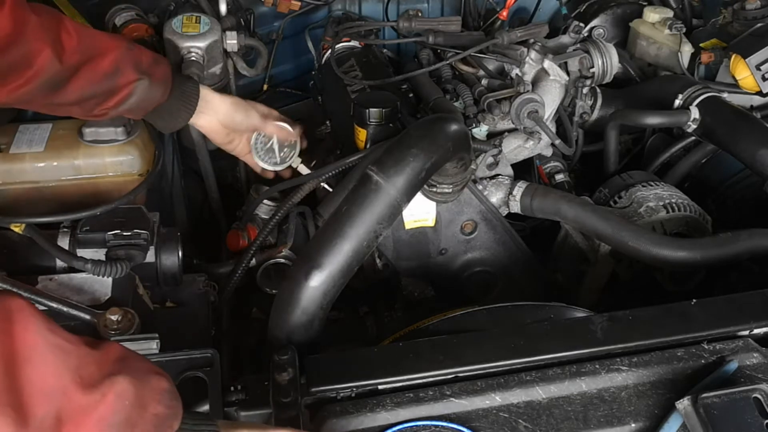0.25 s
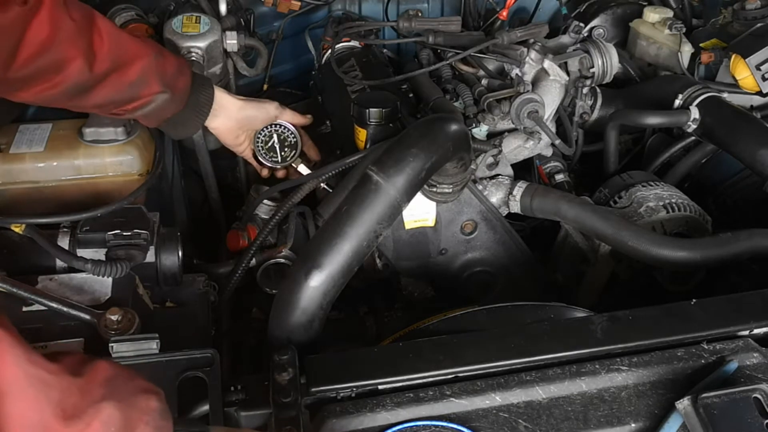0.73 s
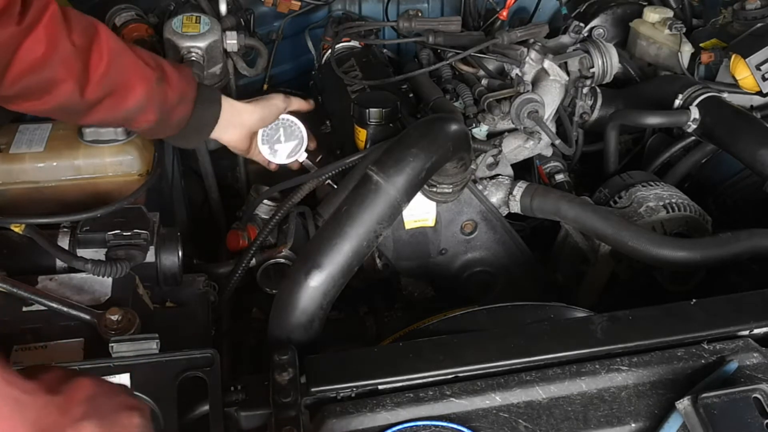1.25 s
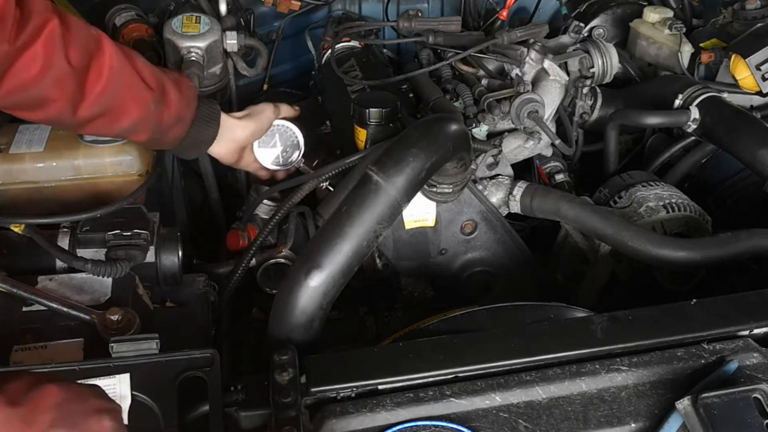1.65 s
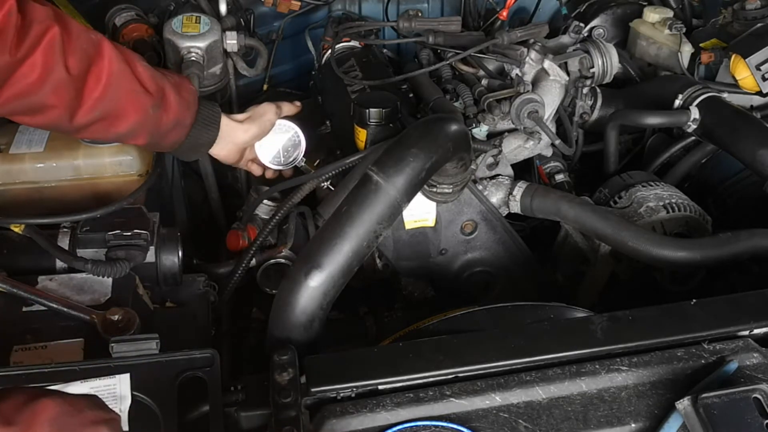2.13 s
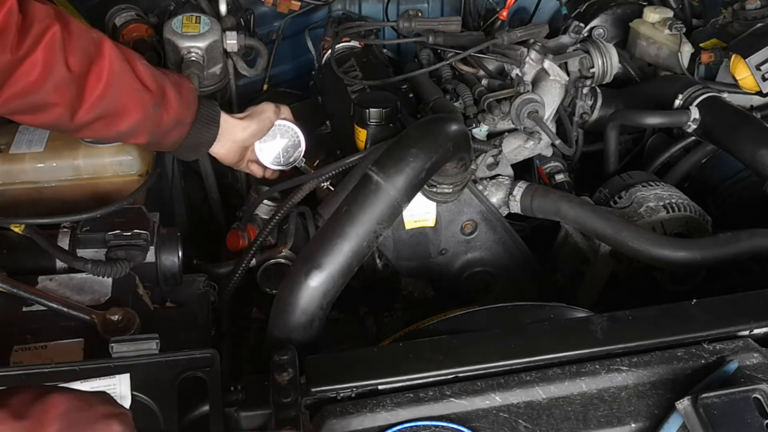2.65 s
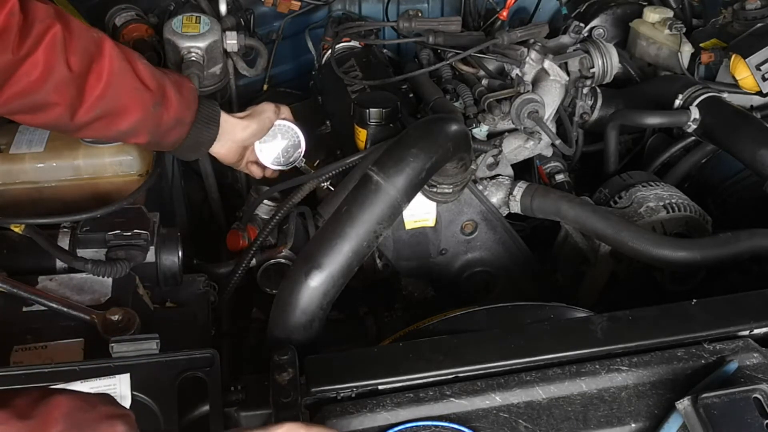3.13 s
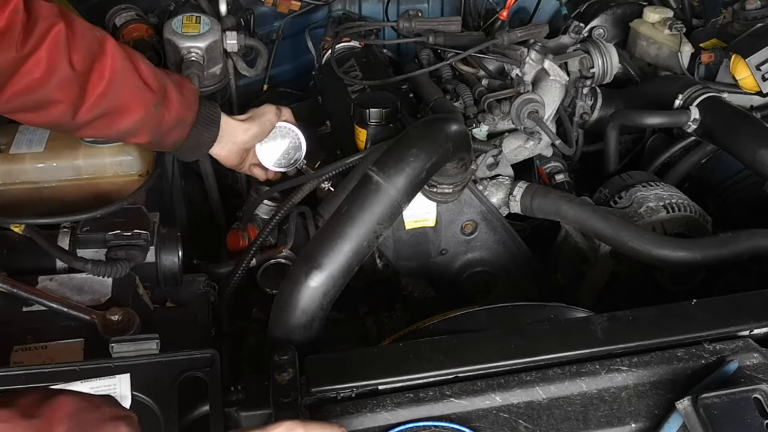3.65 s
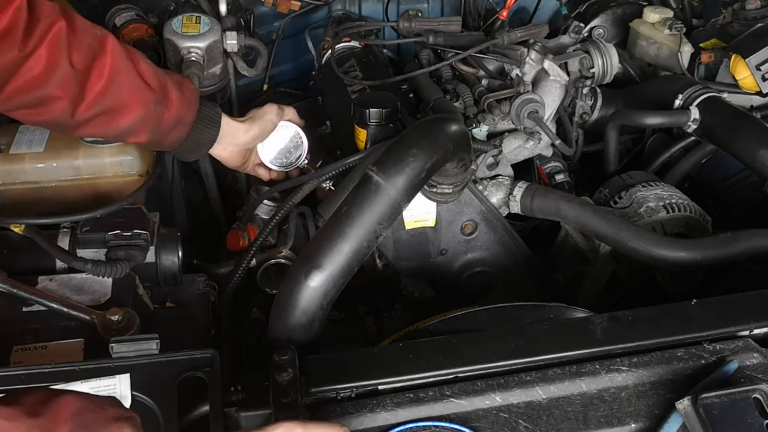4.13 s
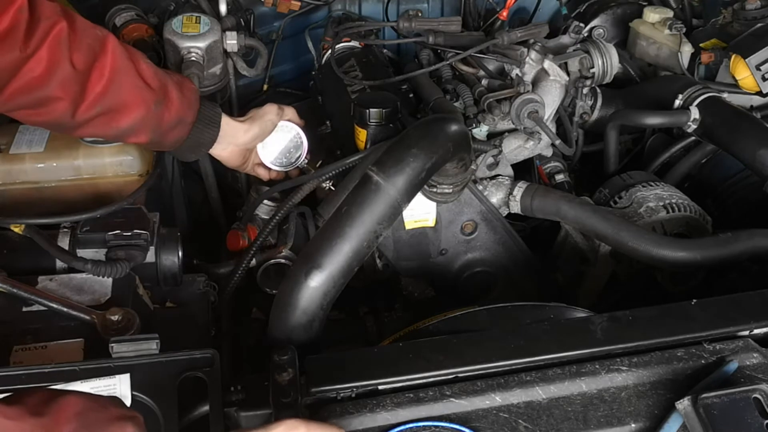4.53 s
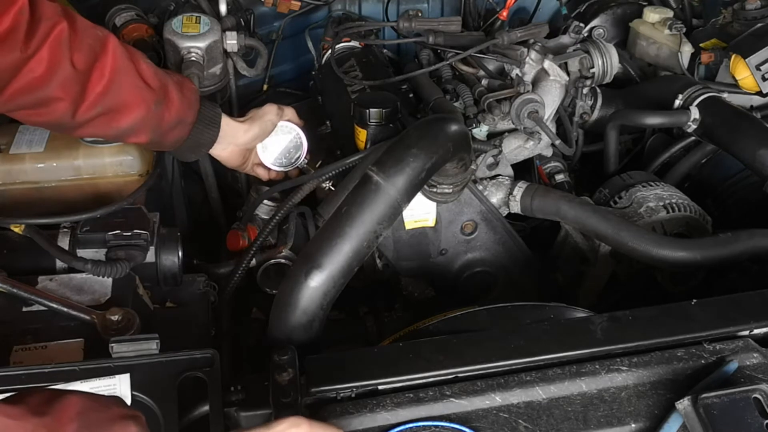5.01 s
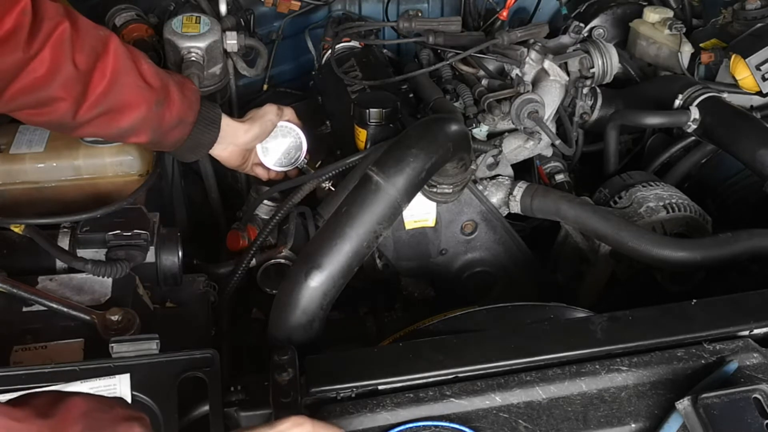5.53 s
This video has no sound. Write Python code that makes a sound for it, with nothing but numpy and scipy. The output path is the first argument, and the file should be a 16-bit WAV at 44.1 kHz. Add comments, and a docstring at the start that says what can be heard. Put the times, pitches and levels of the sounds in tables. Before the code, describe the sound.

Quiet scuffs and ticks from a handled gauge, then two brief, rattling cranks of a four-cylinder car engine that never catches.

```python
"""In a garage, over an open bonnet, a starter motor cranks a four-cylinder engine twice; it never fires.
The pinion clacks in, ringing the steel, and periodic tooth contact makes the gears whine and rattle
up to speed through the resonances of the bell housing. The first try sags under compression and kicks
out; the second cranks on. In the pauses a hand shifts a pressure gauge: small impacts tick and
friction scuffs over a low rumble."""
import sys
import numpy as np
from scipy import signal
from scipy.fft import rfft, irfft
from scipy.io import wavfile
from scipy.ndimage import map_coordinates

SR = 44100
rng = np.random.default_rng(int(sys.argv[2]) if len(sys.argv) > 2 else 0)


def to_wav(sig):
    """Store sig (one row per channel, or 1-D mono) as 16-bit WAV at the path in sys.argv[1].

    Samples outside -1..1 are clipped; the rate is SR.
    """
    pcm = np.clip(np.atleast_2d(sig), -1, 1) * 32767
    pcm = np.round(pcm).astype(np.int16)
    wavfile.write(sys.argv[1], SR, pcm.T)  # frames by channels


N = 254702
TIME, BINS = np.arange(N) / SR, np.fft.rfftfreq(N, 1 / SR)

# Noise spectra. Each row: frequency in Hz, relative spectral density in dB.
RUMBLE_COLOUR = [(8.8, -26.5), (15, 3), (67, -1.5), (165, -17), (405, -56), (625, -59), (700, -49.5),
                 (910, -70.5), (1540, -120)]
AIR_COLOUR = [(88, -26), (150, 0), (350, -9), (495, -15), (787, -17), (1010, -17.5), (1870, -13.5),
              (3540, -21), (4540, -24), (9820, -32), (15000, -41)]
SCUFF_COLOUR = [(290, -41), (500, -17.5), (709, -10.5), (1660, -10.5), (1850, -3.5), (2560, -3.5),
                (3020, -7), (7580, -8.5), (14000, -47)]
CASTING_COLOUR = [(30, -8), (80, 2), (170, -4.5), (260, -7), (380, -7), (500, -21), (1500, -45)]
COAST_COLOUR = [(88, -29.5), (150, -1.5), (556, -6.5), (1070, -1.5), (1200, -8), (1700, 2.5), (3890, -7.5),
                (8100, -8), (15000, -35)]
STEEL_COLOUR = [(88, -36.5), (150, -14), (248, -13.5), (420, -8), (728, -15.5), (936, -8.5), (1450, -5),
                (1730, 1), (2060, -4), (2500, 0), (4460, -10), (5100, -3.5), (6430, -14), (7790, -3.5),
                (11500, -25), (15000, -31)]
SPARK_COLOUR = [(2000, -40), (5500, -14), (8500, 3.5), (10500, -6), (14500, -7.5)]
GEAR_COLOUR = [(88, -32), (150, -17), (189, -15), (294, -14), (420, -15.5), (720, -13.5), (930, -2.5),
               (1230, -4), (2140, -6), (2750, -9.5), (3970, -17.5), (4720, -13.5), (6180, -19),
               (7640, -18.5), (15000, -45)]
# Reverberation of the garage. Each row: frequency in Hz, t60 in seconds.
GARAGE_T60 = [(100, 0.51), (500, 0.2), (1500, 0.38), (4000, 0.33), (8000, 0.27), (14000, .22)]
# Likeness of the two channels. Each row: frequency in Hz, left-right correlation.
COHERENCE = [(60, 0.97734), (150, 0.96), (300, 0.70875), (600, 0.2), (950, 0.8), (1200, .7), (1600, .3),
             (2200, -0.07), (4000, 0), (12000, 0)]
# Balance of the engine's direct sound. Each row: frequency in Hz, left minus right in dB.
ENGINE_BALANCE = [(60, -1), (110, -0.5), (200, -1), (380, 3.5), (700, 0.5), (1290, 2.5), (2380, 6),
                  (4400, 4.5), (8120, 9), (10500, -0.5), (15000, 0)]

# Arm movements near the microphone. Each row: middle and half width in seconds, rumble and rustle in dB.
ARM_MOVES = [(.14, 0.14147, -40, -62.5), (0.45, 0.12, -37.5, -59.5), (.65, 0.1132, -45.5, -62),
             (1.0, 0.2405, -55.5, -68.5), (1.5, 0.3029, -71, -61.5), (1.8, 0.2328, -50, -70.5)]
# Handling thuds. Each row: start in seconds, level in dB, frequency in Hz, t60 in seconds.
HANDLING_THUDS = [(.09, -31.5, 48.03, 0.09125), (0.129, -27.5, 54.82, 0.07907), (.16, -32.5, 50.01, 0.0772),
                  (.203, -30.5, 80.3, 0.1119), (.352, -27, 41.85, 0.1116), (.397, -26.5, 120, 0.0711),
                  (.44, -30.5, 55.06, 0.1141), (.485, -28, 45.43, 0.1621), (.622, -36.5, 79.85, 0.0617),
                  (0.646, -30.5, 37.97, 0.0763), (1.75, -35, 26.01, 0.1788)]
# The hose and a panel bump in the engine bay. Each row: start in seconds, level in dB, frequency in Hz, t60 in
# seconds.
BAY_BUMPS = [(.392, -49, 250, .045), (1.648, -52.5, 1277, .1), (1.688, -59, 1300, .08),
             (1.747, -55.5, 2350, .09)]
# Taps on the gauge case. Each row: start in seconds, level in dB.
GAUGE_TAPS = [(1.013, -67.5), (1.724, -64.5), (2.225, -60.5), (4.036, -54.5), (4.094, -63.5)]
# Modes of the case. Each row: frequency in Hz, level in dB, t60 in seconds.
GAUGE_MODES = [(2058.7, -8, 0.0757), (2519, -2, 0.1407), (3045.7, -8.5, 0.0749), (3787.4, -2.5, 0.1265),
               (5288.7, 0, 0.1077)]
# Ticks of the gauge's metal fitting. Each row: start in seconds, level in dB, ring frequency in Hz.
FITTING_TICKS = [(.041, -59.5, 8441), (0.161, -58.5, 7997), (0.293, -64.5, 5940), (.8767, -42.5, 8274),
                 (1.182, -53.5, 6693), (1.201, -60.5, 6900), (1.226, -49.5, 7297), (1.5217, -56.5, 7930),
                 (1.652, -53.5, 7744), (1.7235, -45, 8150), (4.034, -48.5, 7698), (4.094, -62, 7696)]
# Sleeve and hose rub. Each row: start in seconds, level in dB, rise in seconds, tilt in dB per octave.
SCUFFS = [(.2, -58.5, 0.03061, -1.5), (.29, -66.5, 0.00977, -1), (.975, -61, 0.03562, 0.5),
          (1.521, -61.5, 0.0132, 0), (1.57, -65, .035, -4.5), (1.636, -53, 0.01677, -3.5),
          (1.69, -61, 0.00935, -3.5), (1.722, -60.5, 0.02133, -4), (1.97, -70.5, 0.0813, 5),
          (2.19, -56.5, 0.03372, 0), (4.02, -54, 0.012303, 1.5), (4.613, -63, 0.021435, 2.5),
          (4.675, -65, 0.0251, 0)]
# Thin squeaks. Each row: start and length in seconds, level in dB, frequency and its bend in Hz.
CHIRPS = [(2.713, .08, -61, 7830, -250), (2.92, .124, -53, 8300, 3200), (3.09, .05, -52, 8600, 1000),
          (3.108, .014, -43, 9700, 400), (3.135, .12, -58, 8200, 2450), (3.168, .05, -59, 12400, 400),
          (3.305, .065, -43, 9500, 600), (3.795, .05, -74, 7070, 500), (3.905, .05, -74, 7070, 450),
          (5.283, .012, -44, 10120, 200), (5.492, .012, -54, 14000, 200), (5.674, .014, -48, 10100, 200)]

# Low puffs of the turning engine. Each row: start in seconds, level in dB, pitch in Hz, t60 in seconds.
PUFFS = [(2.988, -34.5, 39.95, 0.1519), (3.1, -34, 44.99, 0.1433), (3.152, -33, 47.52, 0.2091),
         (3.335, -23, 58.17, 0.0744), (5.425, -26, 55, 0.24), (5.432, -30.5, 94.41, 0.1502)]
# Modes of the mounted block. Each row: frequency in Hz, level in dB, t60 and rise in seconds.
BLOCK_MODES = [(55, -14, .1, .012), (124, -1, .12, .021)]
# Modes of struck steel. Each row: frequency in Hz, t60 in seconds, level in dB.
STEEL_MODES = [(955, 0.055, -2), (1145, .05, -6.5), (1331.6, 0.047, 2), (1608, 0.054, -4.5),
               (1853.6, 0.044, -1.5), (2457.5, 0.055, 2.5), (2773.1, 0.15, -6), (3233.2, 0.14, 2.5),
               (4943, 0.045, -13), (7121.6, 0.08, -2.5), (7750, .07, -3)]
# The pinion strikes the ring gear and bounces. Each row: delay in seconds, level in dB,
# rise and t60 in seconds, tilt in dB per octave, ring level in dB, ring centre in Hz.
ENGAGE = [(0, -16, 0.0013, .085, 0, -5, 1843), (.007, -19, 0.00036, .06, -1, -3, 2490)]
# The solenoid pulls in before the strike. One row as in ENGAGE, without the delay.
SOLENOID = (-30.5, 0.0002, 0.3244, -1.5, -10, 1400)
# The pinion seats after the strike. One row as in ENGAGE, without the level.
SEAT = (.015, 0.0265, 0.0572, -5, 2, 950)
# The pinion rasps out, flies back, hits its stop and bounces. Rows as in ENGAGE, timed from key-off.
KICK_OUT = [(-.06, -31.5, 0.01, 0.31, 13.5, -8, 7520), (0, -19.5, 0.0064, 0.031, -1, -2, 1350),
            (.0035, -13, .0012, .058, 7.5, -6, 1330), (0.0104, -15.5, 0.0011, 0.089, 5, -7, 7500)]
# Backlash as the load reverses. Each row: start in seconds, clack and block levels in dB,
# tilt in dB per octave, thud level in dB.
BACKLASH = [(3.09, -26, -25, -3.5, -32.5), (3.297, -29.5, -43, -5, -35), (3.516, -36, -39, -1.5, -53)]
# Resonances and dead spots of the bell housing. Each row: frequency and width in Hz, lift in dB.
HOUSING_MODES = [(245, 130, 5), (430, 70, -3), (760, 120, -5), (950, 56, 13.5), (1040, 40, 8.5),
                 (1130, 60, 12), (1290, 50, 9), (1605, 34, 8), (1780, 45, 4), (2400, 70, 8),
                 (2735, 140, 12), (2960, 150, -5), (3177, 55, 10.5), (3490, 45, 9), (4690, 110, 7),
                 (5240, 160, 5), (5950, 700, -6), (7460, 150, 7)]
# Partials of the whine. Each row: multiple of the tooth frequency, level in dB.
GEAR_ORDERS = [(.83, -28), (1, -18), (1.17, -30), (1.5, -25), (2, -17.5), (2.68, -23), (3, -18), (3.6, -25),
               (4, -19), (5, -25.5), (6, -25), (6.95, -22.5), (7.96, -19.5), (8.4, -13), (8.75, -20.5),
               (10, -23), (11.4, -23.5), (12.4, -20.5), (13.2, -24.5), (14, -23), (15.3, -23.5),
               (16.3, -15.5), (17.2, -22)]
# The compression stroke. One row: peak and half width in seconds, share of the speed lost.
COMPRESSION = (3.366, .198, .476)
# Turns of the key. Each row: strike, stop and spin-up time in seconds,
# gear and seating levels in dB, solenoid lead in seconds.
TRIES = [(2.8078, 3.344, .2, -30, -34.5, .017), (5.203, 5.8, .2485, -28.5, -22, .021)]

MESH_HZ, FREE_HZ = 111, 392  # tooth frequency at engagement and at free speed


def amp(db):
    """Amplitude grows tenfold for every 20 dB."""
    return 10 ** (np.asarray(db) / 20)


def unit_rms(x):
    """Normalisation to unit mean power."""
    return x / np.sqrt(np.mean(x ** 2) + 1e-20)


def curve_at(points, hz):
    """Interpolation on a logarithmic frequency axis."""
    f, value = np.transpose(points)
    return np.interp(np.log(hz + 1), np.log(f + 1), value)


def add(mix, s, sound):
    """Superposition: a sound joins the mix at s seconds."""
    part = mix[:, round(s * SR):][:, :sound.shape[-1]]
    part += sound[..., :part.shape[1]]


def stereo(x, gain_db):
    """Partial coherence: two unrelated signals, filtered, grow alike in the bass as at close points."""
    hz, (a, b) = np.fft.rfftfreq(x.shape[1], 1 / SR), rfft(x)
    likeness = curve_at(COHERENCE, hz)
    mid, side = a * np.sqrt(1 + likeness), b * np.sqrt(1 - likeness)
    spectra = np.array([mid + side, mid - side]) * amp(gain_db(hz))
    return unit_rms(irfft(spectra, x.shape[1]))


def stereo_phase(hz):
    """A tone's left-right correlation is the cosine of its phase difference."""
    return np.arccos(curve_at(COHERENCE, hz)) * np.array([[-.5], [.5]])


def noise(colour, size, tilt_db=0):
    """Spectral shaping of white noise, with a tilt per octave above 500 Hz."""
    white = rng.standard_normal((2, size))
    return stereo(white, lambda hz: curve_at(colour, hz) + tilt_db * np.log2(np.maximum(hz, 500) / 500))


def wobble(size, hz, step=8):
    """Random modulation: low-passed noise of unit rms."""
    coarse = signal.lfilter(*signal.butter(2, hz, fs=SR / step), rng.standard_normal(size // step + 2))
    return unit_rms(np.interp(np.arange(size) / step, np.arange(len(coarse)), coarse))


def blow(t, rise, t60):
    """Damping: after a linear rise the amplitude decays exponentially."""
    return np.minimum(t / rise, 1) * np.exp(-np.log(1000) * np.maximum(t - rise, 0) / t60)


def swell(t, middle, half_width):
    """A Gaussian envelope of height 1."""
    return np.exp(-((t - middle) / half_width) ** 2)


def background(settle_db_per_s=1, lumps_db=2.5):
    """Incoherent powers add: low rumble and room hiss both swell when the arm moves."""
    rumble, hiss = amp(-52 - settle_db_per_s * TIME), amp(-65.5)
    for middle, half_width, rumble_db, rustle_db in ARM_MOVES:
        move = swell(TIME, middle, half_width)
        rumble = np.hypot(rumble, amp(rumble_db) * move)
        hiss = np.hypot(hiss, amp(rustle_db) * move)
    lumpy_rumble = noise(RUMBLE_COLOUR, N) * rumble * amp(lumps_db * wobble(N, 11))
    return lumpy_rumble + noise(AIR_COLOUR, N) * hiss


def garage(x):
    """Diffuse reverberation: each band decays at its own rate."""
    hz, t, bands = signal.stft(stereo(rng.standard_normal((2, SR)), np.zeros_like), SR, nperseg=256)
    decay = np.exp(-np.log(1000) * t / curve_at(GARAGE_T60, hz)[:, None])
    tail = signal.istft(bands * decay * np.minimum(t / .004, 1), SR, nperseg=256)[1]
    return signal.fftconvolve(x, tail / np.linalg.norm(tail[0]), axes=1)[:, :N]


def engine_bay(x, echo_db=-10):
    """Interference of dense early echoes: a gliding partial flares and fades across standing waves."""
    t = np.arange(SR // 12) / SR
    echoes = stereo(rng.standard_normal((2, len(t))), np.zeros_like) * blow(t, rise=.0023, t60=.08)
    echoes *= amp(echo_db) / np.linalg.norm(echoes[0])
    reflected = signal.fftconvolve(x, echoes, axes=1)[:, :x.shape[1]]
    return (x + reflected) / np.hypot(1, amp(echo_db))


def thump(db, hz, t60, rise=.012):
    """A damped oscillator swings at one low frequency."""
    t = np.arange(SR // 2) / SR
    return amp(db) * blow(t, rise, t60) * np.sin(2 * np.pi * hz * t)


def tap(db, hz, t60, spread=.02335):
    """Close modes of a small struck part ring as narrow-band noise, building over two cycles."""
    t = np.arange(SR // 4) / SR
    white = rng.standard_normal((2, len(t)))
    cluster = stereo(white, lambda f: -20 * np.log10(1 + ((f / hz - 1) / spread) ** 2))
    return amp(db) * cluster * blow(t, 2 / hz, t60)


def gauge_case(db):
    """Modal superposition: one tap excites every mode of the case."""
    return sum(tap(db + mode_db, hz, t60) for hz, mode_db, t60 in GAUGE_MODES)


def fitting_tick(db, hz):
    """A brief metal contact has a broad, bright spectrum and leaves a short ring."""
    t = np.arange(SR // 4) / SR
    colour = [(300, -24.5), (1500, -10), (3500, -15.5), (5300, -8.5),
              (6300, -1), (8200, 6), (10500, -23.5), (15000, -36)]  # Hz, dB
    click = amp(db - 2) * noise(colour, len(t)) * blow(t, rise=.001, t60=.04142)
    return click + tap(db - 10, hz, t60=.08616, spread=.0659)


def scuff(db, rise, tilt_db, grain_db=2.5):
    """Friction noise: a short rub, made grainy by random amplitude modulation."""
    t = np.arange(SR // 2) / SR
    grain = amp(db + grain_db * wobble(len(t), 137.56))
    return grain * noise(SCUFF_COLOUR, len(t), tilt_db) * blow(t, rise, t60=.28832)


def chirp(length, db, hz, bend_hz):
    """Frequency and amplitude modulation: a thin tone bends away and back, sputtering."""
    arch = np.sin(np.linspace(0, np.pi, int(length * SR)))
    pitch = hz + bend_hz * arch + .009 * hz * wobble(len(arch), 700)
    sputter = unit_rms(amp(3.5 * wobble(len(arch), 120)))
    return amp(db) * sputter * np.sqrt(abs(arch)) * np.sin(2 * np.pi * np.cumsum(pitch) / SR)


def engine_block(db):
    """Mass on springs: a blow rocks the block on its mounts."""
    return sum(thump(db + mode_db, hz, t60, rise) for hz, mode_db, t60, rise in BLOCK_MODES)


def casting_thud(db):
    """Structure-borne sound: a hard blow carries through the castings as low, damped noise."""
    t = np.arange(SR // 4) / SR
    return amp(db) * noise(CASTING_COLOUR, len(t)) * blow(t, rise=.004, t60=.1)


def coast(sag_db_per_s=21.5, grain_db=2, coast_s=.22, stop_t60=.1325):
    """Friction: with the pinion out, pistons and belts rub on until the next compression stops them."""
    t = np.arange(SR // 2) / SR
    level_db = -45.5 - sag_db_per_s * t + grain_db * wobble(len(t), 200)
    stop = np.exp(-np.log(1000) * np.maximum(t - coast_s, 0) / stop_t60)
    return amp(level_db) * stop * noise(COAST_COLOUR, len(t))


def clack(db, rise, t60, tilt_db, ring_db, centre_hz, reach_octaves=.17):
    """Impact of steel on steel: a dense crash, and free vibration of the modes near centre_hz."""
    t = np.arange(SR // 4) / SR
    crash = noise(STEEL_COLOUR, len(t), tilt_db) * blow(t, rise, t60)
    ring = np.zeros((2, len(t)))
    for hz, mode_t60, mode_db in STEEL_MODES:
        excitation = amp(ring_db + mode_db) / (1 + (np.log2(hz / centre_hz) / reach_octaves) ** 2)
        phase = 2 * np.pi * (hz * t + rng.random()) + stereo_phase(hz)
        ring += excitation * blow(t, rise, mode_t60) * np.sin(phase)
    return amp(db) * (crash + ring)


def brush_sparks(size, per_s=750, spread_db=4, flurry_db=3):
    """Shot noise: the brushes spark on the commutator in flurries of very unequal impulses."""
    sparks = (rng.random(size) < per_s / SR) * amp(spread_db * np.minimum(rng.exponential(1, size), 3))
    crackle = stereo(sparks * rng.standard_normal((2, size)), lambda hz: curve_at(SPARK_COLOUR, hz))
    return engine_bay(crackle, echo_db=-1.5) * amp(flurry_db * wobble(size, 15))


def resonance_db(hz):
    """Resonance: the bell housing lifts or dips the response in Lorentzian bands."""
    grid = BINS[::32]
    gain = 1 + sum((amp(db) - 1) / (1 + (2 * (grid - f) / width) ** 2) for f, width, db in HOUSING_MODES)
    return np.interp(hz, grid, 20 * np.log10(gain))


def housing_db(hz, ring_share=.35):
    """Cascaded gains add in dB: the housing's broad response plus a share of its resonances."""
    return curve_at(GEAR_COLOUR, hz) + ring_share * resonance_db(hz)


def gear_whine(teeth, pitch, spacing_error=.003, flutter=.33):
    """Periodic meshing radiates partials; uneven tooth spacing blurs the high ones by phase modulation."""
    whine = 0
    for order, db in GEAR_ORDERS:
        cycles = order * (teeth + spacing_error * wobble(len(teeth), 90)) + rng.random()
        phase = 2 * np.pi * cycles + stereo_phase(order * pitch.mean())
        partial = np.sqrt(2) * (1 + flutter * wobble(len(teeth), 22)) * np.cos(phase)
        whine += amp(db + resonance_db(order * pitch)) * partial
    return whine * amp(.6024 * np.log2(pitch / FREE_HZ))  # slightly louder with speed


def tooth_rattle(teeth, hardness_db, uneven_db=3, sliding=.83, scrape_db=2):
    """Impact excitation: each tooth lands with a blow, then slides, driving the housing with noise."""
    count = len(teeth)
    strength = amp(uneven_db * rng.standard_normal(int(teeth[-1]) + 1))[teeth.astype(int)]
    contact = sliding + strength * np.exp(-(teeth % 1) / .42)
    rattle = stereo(contact * rng.standard_normal((2, count)), housing_db)
    treble = signal.sosfiltfilt(signal.butter(2, 3000, "high", fs=SR, output="sos"), rattle)
    treble_gain = amp(hardness_db + scrape_db * wobble(count, 70))  # the edges scrape unevenly
    return rattle + (treble_gain - 1) * treble


def worn_flanks(teeth, pinion_teeth=9, points_per_tooth=48, slip=.005):
    """Quasi-periodic friction: rough flanks return each revolution, giving dense, gliding partials."""
    roughness = rng.standard_normal((2, pinion_teeth * points_per_tooth))
    place = (teeth + slip * wobble(len(teeth), 90)) * points_per_tooth
    rub = np.array([map_coordinates(profile, [place], mode="grid-wrap") for profile in roughness])
    return stereo(rub, lambda hz: housing_db(hz, ring_share=.25))


def motor_drive(t, start, spin_up, bend=1.427):
    """A motor slows under load; speed and compression set the force and hardness of tooth contact."""
    peak, half_width, drag = COMPRESSION
    load = swell(t, peak, half_width)
    unloaded_hz = FREE_HZ - (FREE_HZ - MESH_HZ) * np.exp(-(abs(t - start) / spin_up) ** bend)
    pitch = unloaded_hz * (1 - drag * load)
    octaves = np.log2(pitch / FREE_HZ)
    force_db = 4.26 * octaves + 1.685 * load
    hardness_db = 6 + 3.3 * octaves + 2 * load
    return pitch, force_db, hardness_db


def starter(start, stop, spin_up, level_db, mesh_s=.023, release_s=.03, jitter=.002):
    """Forced vibration: one rotation drives whine, grind and rattle, over sparks and engine shake."""
    t = np.arange(start, stop + release_s, 1 / SR)
    pitch, force_db, hardness_db = motor_drive(t, start, spin_up)
    meshed = np.minimum(np.minimum((t - start) / mesh_s, (t[-1] - t) / release_s), 1)
    teeth = np.cumsum(pitch * (1 + jitter * wobble(len(t), 60))) / SR  # teeth passed so far
    whine = gear_whine(teeth, pitch)
    machine = amp(-6) * tooth_rattle(teeth, hardness_db)
    machine += amp(-1.5) * engine_bay(whine)
    machine += amp(-5.5) * engine_bay(worn_flanks(teeth))
    machine += amp(-28) * brush_sparks(len(t))
    shake = amp(-50.5) * noise(RUMBLE_COLOUR, len(t))
    return meshed * (amp(level_db + force_db) * machine + shake)


def scene(engine_room_db=-11, hand_room_db=-10, hand_left_db=8.5):
    """Direct and reverberant fields add; level differences place starter and hand to the left."""
    engine, low, hand = np.zeros((3, 2, N))
    for start, stop, spin_up, level_db, seat_db, lead in TRIES:
        add(engine, start, starter(start, stop, spin_up, level_db))
        add(engine, start - lead, clack(*SOLENOID))
        add(low, start - lead, engine_block(db=-29.5))
        add(low, start, casting_thud(db=-37))
        for delay, *hit in ENGAGE:
            add(engine, start + delay, clack(*hit))
        add(engine, start + SEAT[0], clack(seat_db, *SEAT[1:]))
    key_off = TRIES[0][1]
    for delay, *hit in KICK_OUT:
        add(engine, key_off + delay, clack(*hit))
    add(engine, key_off, coast())
    add(low, key_off, casting_thud(db=-34))
    for s, clack_db, block_db, tilt_db, thud_db in BACKLASH:
        add(engine, s, clack(clack_db, rise=.0016, t60=.1, tilt_db=tilt_db, ring_db=-3.5, centre_hz=980))
        add(low, s - .0041, engine_block(block_db))  # the block moves just before the knock
        add(low, s, casting_thud(thud_db))
    for s, *puff in PUFFS:
        add(low, s, thump(*puff))
    for s, *thud in HANDLING_THUDS:
        add(low, s, thump(*thud, rise=.003164))
    for source, rows in [(fitting_tick, FITTING_TICKS), (gauge_case, GAUGE_TAPS), (tap, BAY_BUMPS),
                         (scuff, SCUFFS), (chirp, CHIRPS)]:
        for s, *settings in rows:
            add(hand, s, source(*settings))
    sides = np.array([[.5], [-.5]])
    direct = irfft(rfft(engine) * amp(curve_at(ENGINE_BALANCE, BINS) * sides), N)
    near = hand * amp(hand_left_db * sides)
    reverb = garage(amp(engine_room_db) * (engine + low) + amp(hand_room_db) * hand)
    return direct + low + near + reverb + background()


def record(dry, ceiling=.8, cutoff_hz=15400):
    """Soft saturation rounds the hardest peaks; a low-pass filter then limits the band."""
    rounded = dry / (1 + (dry / ceiling) ** 6) ** (1 / 6)
    low_pass = signal.firwin(401, cutoff_hz, window=("kaiser", 9), fs=SR)
    return signal.oaconvolve(rounded, low_pass[None], "same")


dry = scene()
out = record(dry)
to_wav(out)
```